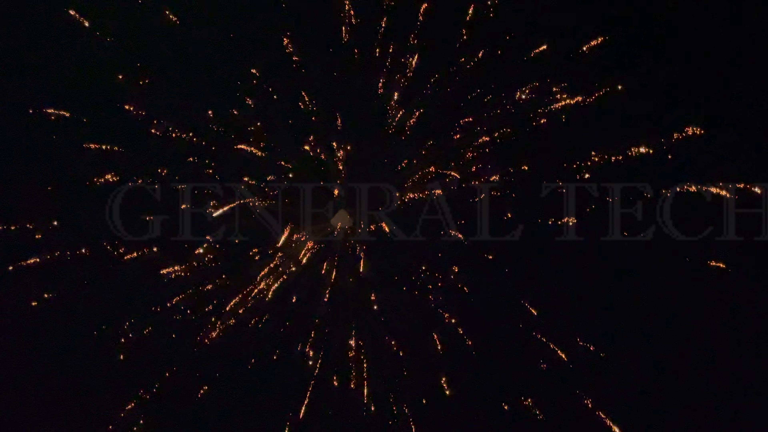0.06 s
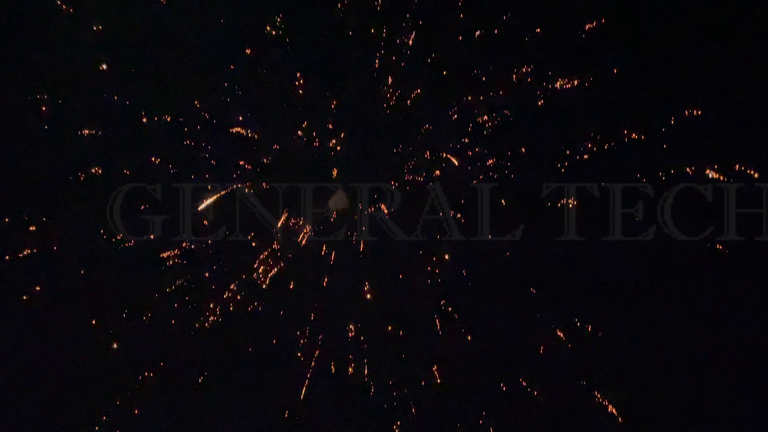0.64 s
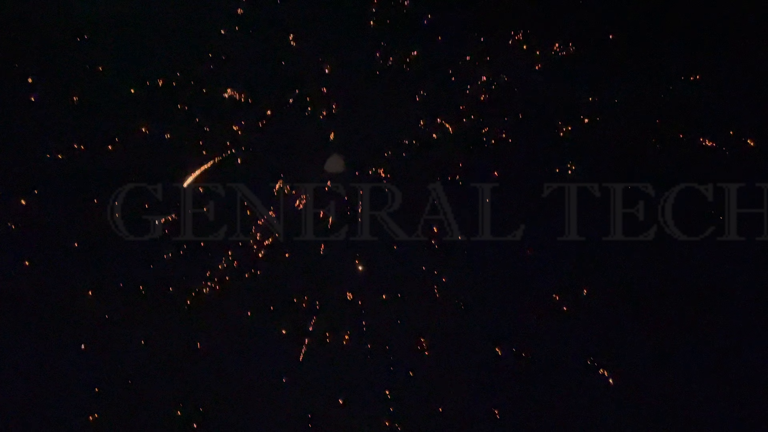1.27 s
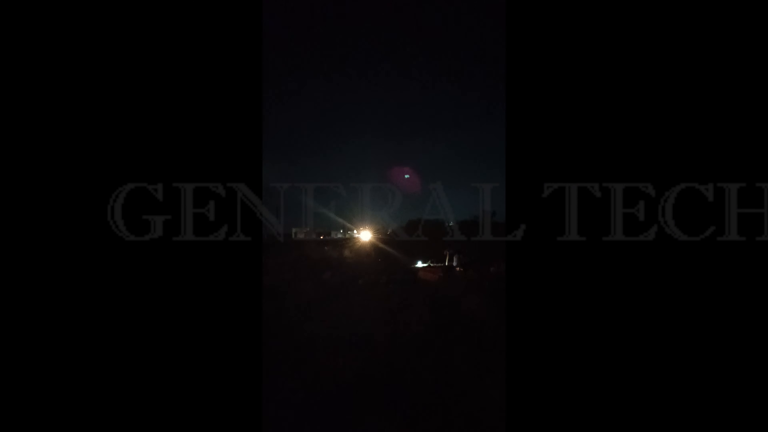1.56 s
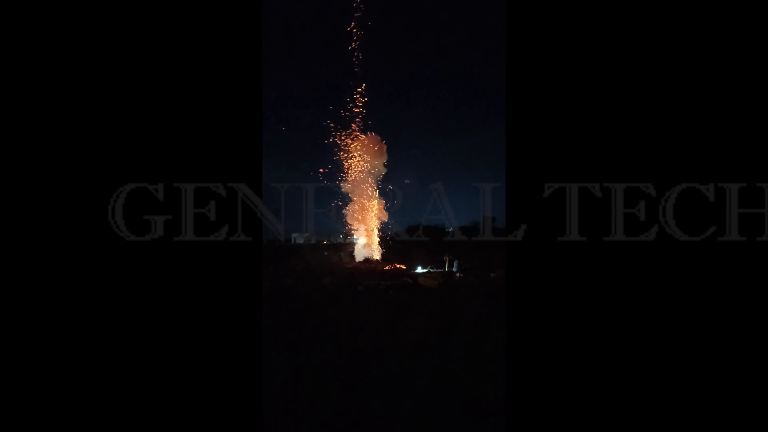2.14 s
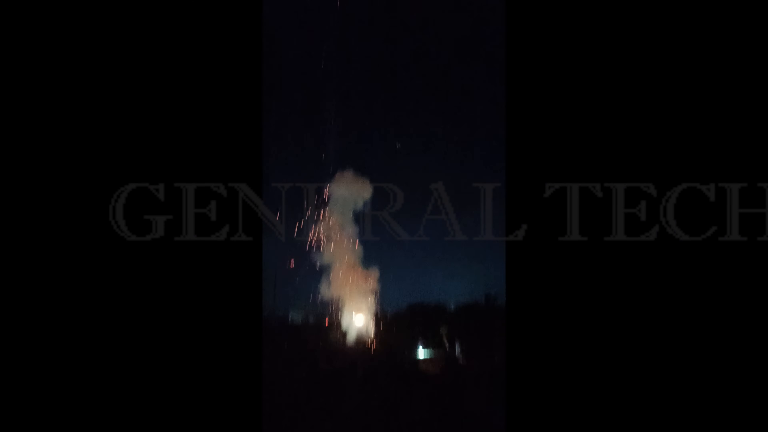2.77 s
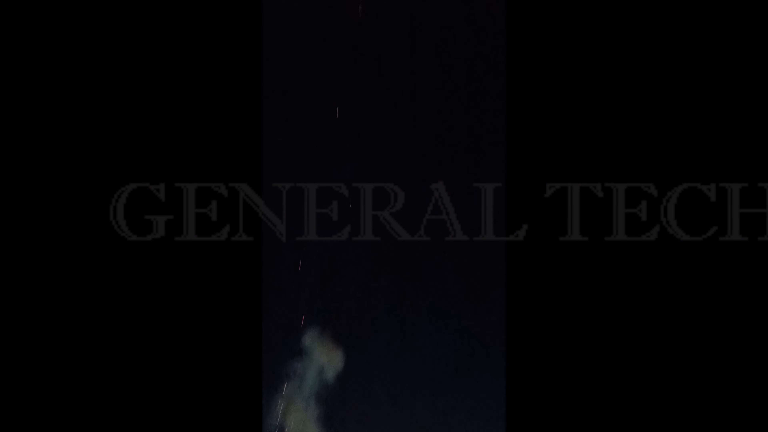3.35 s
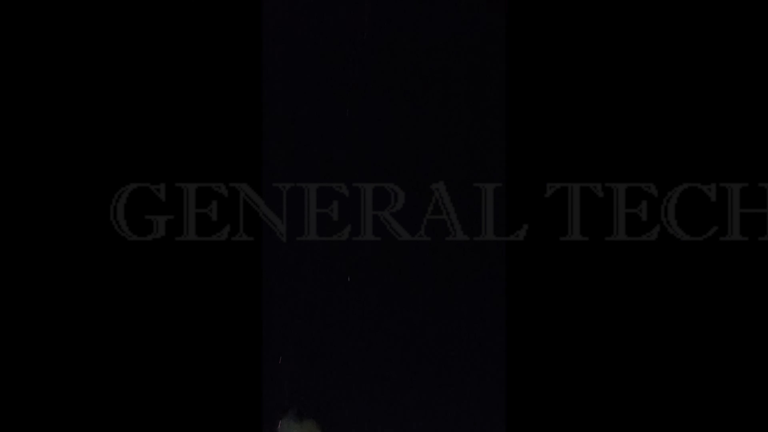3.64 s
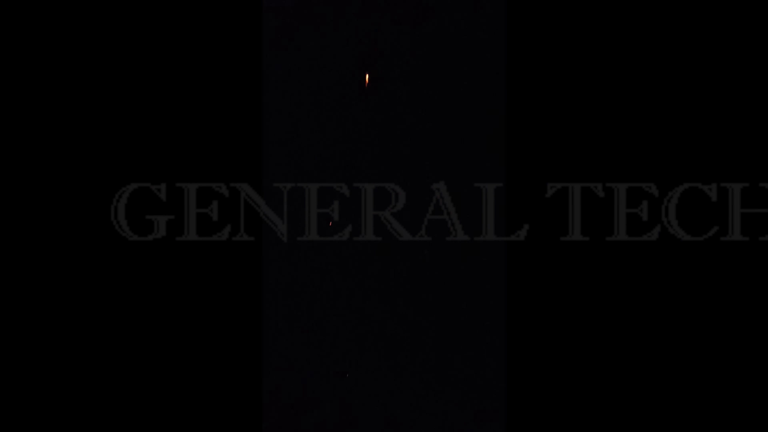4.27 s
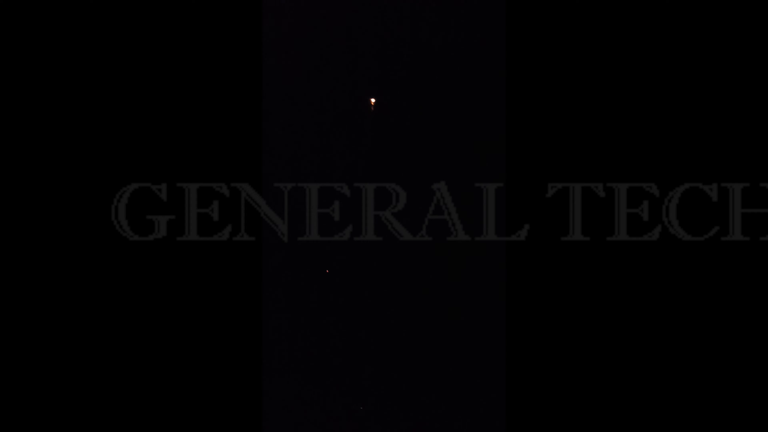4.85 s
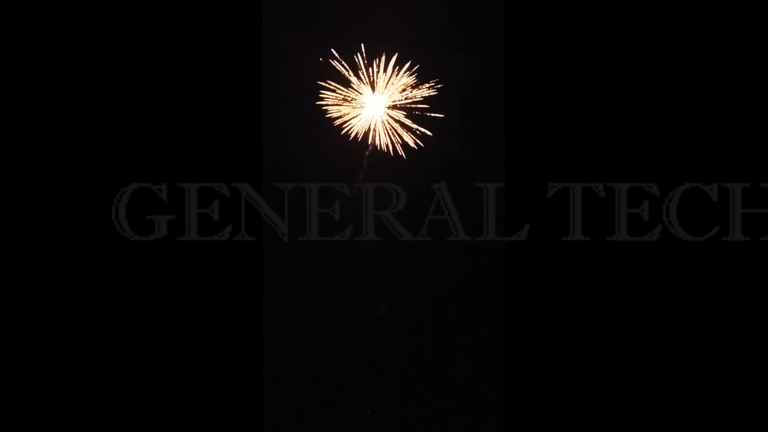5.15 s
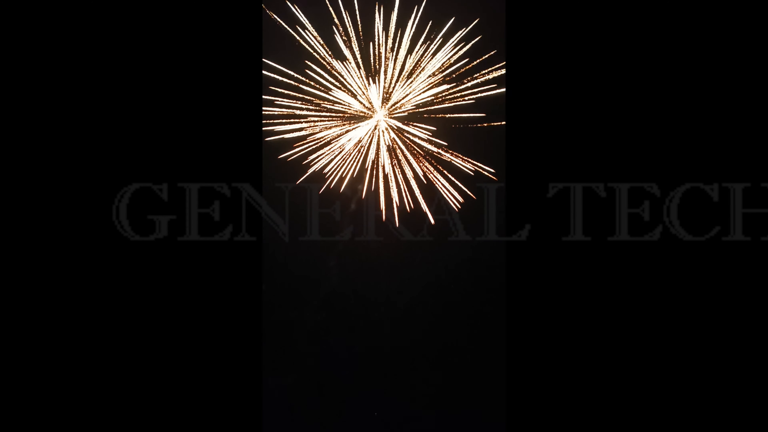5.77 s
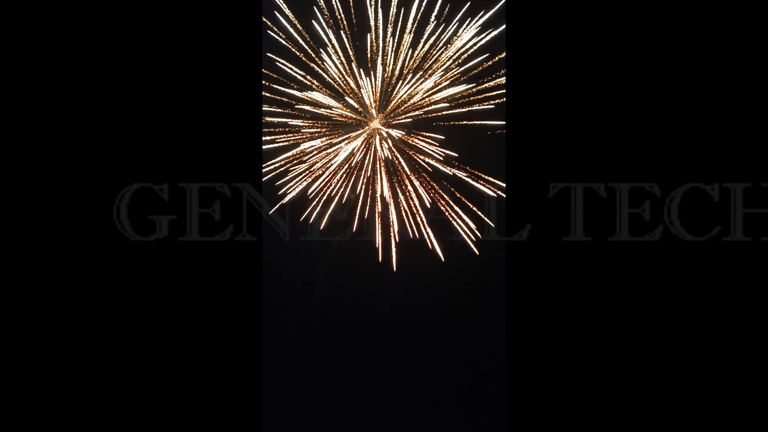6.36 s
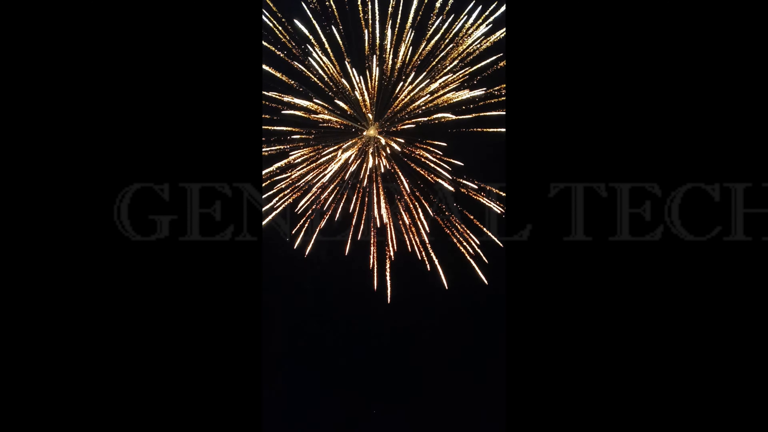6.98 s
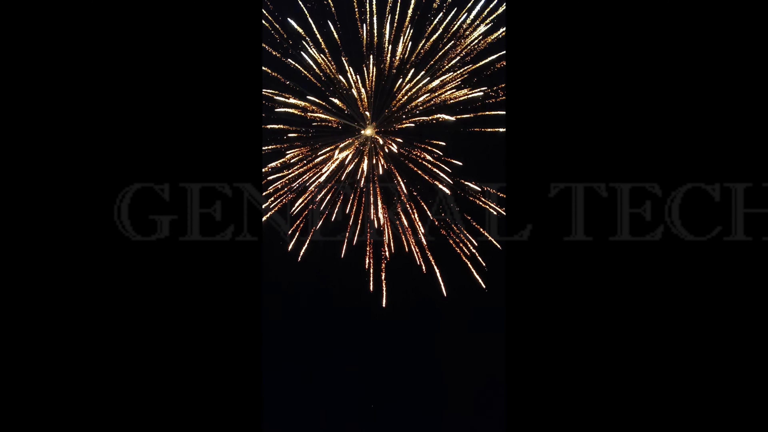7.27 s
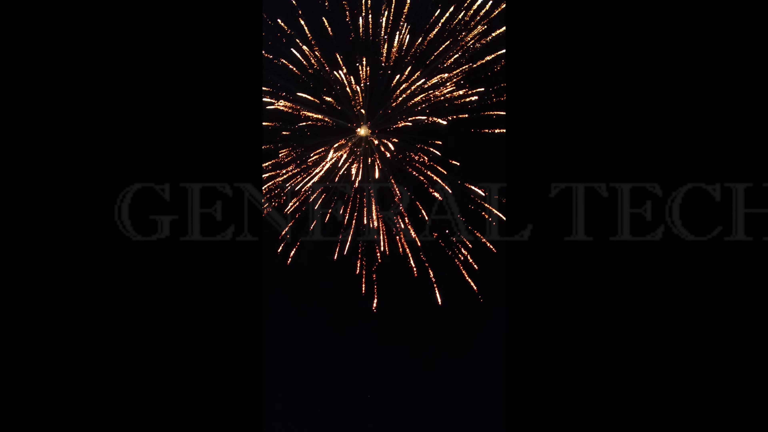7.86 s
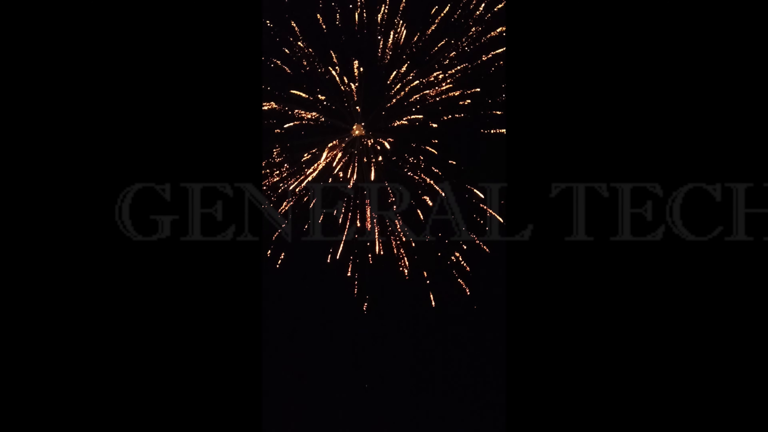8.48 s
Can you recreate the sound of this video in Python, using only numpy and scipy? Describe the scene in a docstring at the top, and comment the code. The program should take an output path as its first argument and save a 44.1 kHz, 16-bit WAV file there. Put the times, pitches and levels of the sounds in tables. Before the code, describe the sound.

Dull distant fireworks, then a punchy launch bang, sputtering sparks and a sharp overhead burst, with wind buffeting the microphone.

```python
"""Faint chirps, thin whirs and dull, far-off fireworks in a night breeze, heard by a hand-held phone.
The scene cuts to a mortar: the fuse hisses, the lift charge bangs, the tube rings and sparks sputter.
The shell climbs hissing and bursts with a sharp crack; echoes follow, the stars roar and sizzle.
Each bang is a cluster of pressure fronts, burning powder is grainy noise, and wind buffets the mic ports."""
import sys
import numpy as np
from scipy import signal
from scipy.fft import rfft, irfft, next_fast_len
from scipy.io import wavfile
from scipy.ndimage import uniform_filter1d, map_coordinates

SR = 44100
rng = np.random.default_rng(int(sys.argv[2]) if len(sys.argv) > 2 else 0)


def generate_wav(signal):
    """Clip the signal to [-1, 1] and save it as 16-bit WAV at the path in sys.argv[1]."""
    frames = np.transpose(np.atleast_2d(signal))
    scaled = np.clip(frames, -1, 1) * 32767
    pcm = np.round(scaled).astype(np.int16)
    wavfile.write(sys.argv[1], SR, pcm)


N = 380362
T = np.arange(N) / SR
CUT_S, TOP_HZ = 1.508, 15900


# the burst and its first reflections:
# (time [s], thump [dB], push [ms], rise [ms], crack [dB], crack decay [ms])
BURST_FRONTS = [(5.4404, -2, 1.17, 0.056, -3.5, 1.45), (5.444, -10.5, 1.6, 0.02, -26, 3.8),
                (5.446, -5, 2.6, 0.3, -24, 5.3), (5.451, 1.5, 1.18, 0.22, -15, 1.8),
                (5.4796, -42, .5, .2, -15, 0.54)]
# tone of its crack: (frequency [Hz], level [dB])
BURST_COLOUR = [(150, -5), (330, 2), (800, -4), (1400, 2), (2100, 7), (3000, -6.5), (6000, -15.5),
                (8700, -6.5), (11000, -16), (16000, -20)]
BURST_S = BURST_FRONTS[0][0]
def burst():
    """The shell bursts overhead, a little to the left: a sharp crack on a deep thump."""
    bang = blast(BURST_FRONTS, BURST_COLOUR, ring_hz=114, damping=0.44, apart_hz=3000)
    return arrive(bang, lead_ms=0.11) * ports(2.4)


# pressure fronts from the mortar:
# (time [s], thump [dB], push [ms], rise [ms], crack [dB], crack decay [ms])
LIFT_FRONTS = [(1.856, -9, 2.1, 0.15, -15, 6.8), (1.861, -29, 2.2, 0.34, -9, 5.6),
               (1.865, -25, 1, 0.35, -5, 4.1), (1.871, -11, 1.7, 0.45, -6, 4.3),
               (1.8766, -11, 1.2, 0.38, -39, 4.8), (2.001, -11, 3, 0.5, -17, 3.5),
               (2.4407, -16.5, 3.27, 0.71, -21, 2.7)]
# tone of their crack: (frequency [Hz], level [dB])
LIFT_COLOUR = [(150, -12), (300, 0), (400, -29), (540, -4), (700, -6), (1100, -14.5), (1500, -4),
               (1850, -7.5), (2500, 3.5), (3200, -12), (5500, -23), (8500, -19), (11000, -28), (16000, -25)]
LIFT_S = LIFT_FRONTS[0][0]
def lift():
    """The lift charge fires the shell with a ragged, punchy bang."""
    return blast(LIFT_FRONTS, LIFT_COLOUR, ring_hz=188, damping=0.31, apart_hz=4870)


# resonances of the tube: (frequency [Hz], level [dB], decay [ms])
TUBE_MODES = [(535, -27.5, 22), (654, -21.5, 9.2), (990, -47, 22)]
# tone of the boom: (frequency [Hz], level [dB])
BOOM_COLOUR = [(200, -16), (350, 8), (440, -2.5), (620, -7), (750, -9), (860, -14), (985, -11), (1150, -26),
               (2000, -45)]
def tube(start_s=1.885, rise_ms=4, boom_db=-34, boom_db_per_s=-12):
    """The emptied mortar tube rings briefly, and a hollow boom rolls on behind the lift."""
    age = T - start_s
    ring = sum(undb(db) * swell(start_s, rise_ms, decay_ms) * np.sin(2 * np.pi * hz * age)
               for hz, db, decay_ms in TUBE_MODES)
    roll = held(start_s, length_s=0.22, attack_s=0.01, release_s=0.0054)
    return ring + roll * undb(boom_db + boom_db_per_s * age) * noise(BOOM_COLOUR, alike=1)


# echoes of the bangs, the second bang's body (2.003 s), a surge as the stars' roar sets in (6.184 s) and a
# star's pop (6.514 s): # (time [s], rumble [dB], hiss [dB], rise [ms], decay [ms])
AFTER_SWELLS = [(1.882, -18, -27, 3.3, 10), (1.935, -36, -30, 15, 19), (1.975, -37, -33, 11, 26),
                (2.003, -19, -11, 4.5, 2.6), (2.04, -37, -33.5, 19, 41), (2.064, -34, -39, 2.5, 8.2),
                (2.092, -30, -29.5, 2.8, 6.6), (2.45, -35.5, -48.5, 40, 33), (5.457, -37, -28.5, 3.1, 22),
                (5.495, -27.5, -33, 0.7, 86), (5.511, -21, -37.5, 16, 16), (5.87, -30.5, -43, 29, 24),
                (6.184, -30.5, -36.5, 20, 43), (6.514, -23, -24, 0.52, 3.4), (6.655, -23, -36, 30, 30),
                (6.77, -29, -56, 2, 31)]
# tones of their hiss and their rumble: (frequency [Hz], level [dB])
SWELL_HISS_COLOUR = [(150, -32), (350, 5), (600, 0), (1100, -3), (1500, 2), (2300, 3.5), (3200, -4),
                     (6500, -10.5), (8700, -8.5), (11000, -18.5), (16000, -24)]
SWELL_RUMBLE_COLOUR = [(40, -20), (90, 3.5), (170, 11.5), (320, -1.5), (600, -10.5), (1200, -23)]
def after_swells(dulling_s=0.22, dull_hz=3800):
    """Swells of rumble and hiss follow the lift and the burst; the later they come, the duller."""
    rumble = sum(undb(db) * swell(s, rise, decay) for s, db, _, rise, decay in AFTER_SWELLS)
    hiss = sum(undb(db) * swell(s, rise, decay) for s, _, db, rise, decay in AFTER_SWELLS)
    bright = noise(SWELL_HISS_COLOUR, alike=0.66, apart_hz=1610, grain_db=3.5)
    dull = soften(bright, dull_hz)
    age = T - np.where(T < BURST_S, LIFT_S, BURST_S)
    early = 1 / (1 + (age / dulling_s) ** 4)
    return rumble * noise(SWELL_RUMBLE_COLOUR, alike=0.98) + hiss * (dull + early * (bright - dull))


# tones of the tail's rush and its sizzle: (frequency [Hz], level [dB])
RUSH_COLOUR = [(100, 12), (300, -11), (700, 1.5), (1000, 0), (1300, 1.5), (1650, 2.5), (2250, -0.5),
               (2750, -4), (3350, -4), (3750, -18.5), (4200, -26), (5300, -20), (7000, -20.5),
               (10000, -26.5), (16000, -33)]
TAIL_SIZZLE_COLOUR = [(2500, 3), (4500, 13.5), (6000, 9), (8000, 3.5), (9500, 3.5), (11000, -3.5),
                      (12300, -21), (14500, -9), (16000, -21)]
def shell_tail(start_s=2.825, rush_db_per_s=3.5, sizzle_db_per_s=2, flutter_db=1.5):
    """The climbing shell hisses from one point, ever louder; its sizzle flares before the burst."""
    age = np.clip(T, start_s, BURST_S) - start_s
    rush = noise(RUSH_COLOUR, alike=0.975, apart_hz=40000, grain_db=2.5)
    rush *= undb(-48 + rush_db_per_s * age) * ports(-0.64)
    flare = undb(-50.5) * swell(5.05, rise_ms=360, decay_ms=62)
    sizzle = noise(TAIL_SIZZLE_COLOUR, alike=0.975, apart_hz=23500, grain_db=2)
    sizzle *= (undb(-59 + sizzle_db_per_s * age) + flare) * undb(flutter_db * walk(35))
    direct = (rush + sizzle) * held(start_s, BURST_S - start_s, attack_s=0.39, release_s=0.026)
    return direct + bounces(direct, age)


# reflections close to the phone: (delay [ms], drift [ms/s], left level [dB], right level [dB])
BOUNCES = [(0.89, 0.026, -17, -11.5), (0.085, 0.0088, -28, -12)]
def bounces(direct, age, tremor_ms=0.004):
    """Dull reflections hollow the hiss; their delays drift with the tilt and shake with the hand."""
    dull = soften(direct, hz=6500)
    out = 0
    for delay_ms, drift_ms_per_s, left_db, right_db in BOUNCES:
        lag_ms = delay_ms + drift_ms_per_s * age + tremor_ms * walk(7)
        delayed = np.array([np.interp(T - lag_ms / 1000, T, side) for side in dull])
        out = out + undb([[left_db], [right_db]]) * delayed
    return out


# the stars flare up and burn down: (time [s], relative roar [dB], relative sizzle [dB])
STAR_LEVELS = [(5.64, -51.5, -57), (5.92, -48.5, -56.5), (6.69, -36.5, -54.5), (7.03, -42.5, -54.5),
               (7.21, -41.5, -49), (7.38, -42, -52), (7.71, -43, -64), (7.91, -49.5, -57.5),
               (8.22, -47, -77), (8.35, -51, -62.5), (8.6, -46.5, -64), (8.62, -56, -59)]
# tone of their roar: (frequency [Hz], level [dB])
STAR_COLOUR = [(100, 9), (300, 1.5), (700, 1), (1200, -5), (1900, -1.5), (3000, -7), (4200, -14),
               (5600, -18.5), (7500, -32), (12000, -49), (16000, -60)]
def stars(roar_db=5.5, sizzle_db=1.5, attack_s=0.037, focus_per_s=0.23, flutter_db=1.04):
    """Stars roar all over the sky, narrowing to a hiss; returns their rush and sizzle envelope."""
    roar_curve_db, sizzle_curve_db = curves(STAR_LEVELS)
    lit = np.clip((T - BURST_S) / attack_s, 0, 1)
    focus = np.clip(focus_per_s * (T - BURST_S), 0, 1)
    roar = noise(STAR_COLOUR, alike=1, apart_hz=686, grain_db=3) * ports(0.3)
    hiss = noise(RUSH_COLOUR, alike=1, grain_db=3) * ports(-2.3)
    rush = np.sqrt(1 - focus) * roar + np.sqrt(focus) * hiss
    rush *= undb(roar_curve_db + roar_db + flutter_db * walk(34))
    return lit * rush, lit * undb(sizzle_curve_db + sizzle_db)


# tone of powder burning at the mortar: (frequency [Hz], level [dB])
MORTAR_COLOUR = [(100, 9), (300, 7.5), (650, 6), (850, 1), (985, 11), (1170, -6), (1350, 9), (1750, 8.5),
                 (2350, 9), (2900, 2.5), (4200, -2.5), (6000, -11), (9000, -17.5), (11500, -49),
                 (16000, -43)]
def mortar(shower_db_per_s=-2.5, sizzle_extra_db_per_s=-14):
    """The fuse hisses, then a spark shower sputters out; returns their rush and sizzle envelope."""
    fuse = held(CUT_S, LIFT_S - CUT_S, attack_s=0.004, release_s=0.088)
    age = np.maximum(T - LIFT_S, 0)
    shower = held(LIFT_S, length_s=1.48, attack_s=0.09, release_s=0.11) * undb(shower_db_per_s * age)
    rush = noise(MORTAR_COLOUR, alike=1, apart_hz=2690)
    sputter = crackle(per_s=480, decay_ms=3.2, spread_db=1.7)
    sizzle = undb(-60.5) * fuse + undb(-53.5 + sizzle_extra_db_per_s * age) * shower
    return rush * (undb(-49) * fuse + undb(-44) * shower * sputter), sizzle


# sparks, singly or in clumps: (time [s], relative level [dB], rise [ms], decay [ms])
SPARK_POPS = [(2.125, -29.5, 1.2, 4.8), (2.222, -33, 3, 26), (2.272, -37, .8, 4), (2.313, -42, .8, 6.4),
              (2.366, -33.5, 1.5, 8), (2.388, -34, 6, 7), (2.42, -35, 14, 92), (2.567, -47, .6, 2.2),
              (2.617, -34, 0.34, 4), (2.699, -35, 1, 4.9), (2.718, -36.5, 5.1, 7.3), (2.753, -34.5, 1, 4),
              (2.769, -40, 3.6, 11), (2.832, -32.5, .8, 4), (2.848, -35, .8, 20), (2.876, -34, 1.5, 69),
              (2.921, -34.5, .6, 2), (2.99, -36, .8, 5.2), (3.007, -30, 0.5, 7.7), (3.06, -42, .8, 4),
              (3.161, -30.5, 1.1, 4.1), (3.236, -31.5, 2.3, 14), (3.315, -33.5, 1, 5.8),
              (3.336, -38, 1.5, 13), (3.387, -30.5, 14, 8.9), (3.452, -32.5, 0.94, 4.3),
              (5.749, -31.5, .5, 2.5), (6.514, -22, 0.43, 2)]
def sparks(gain_db=-6.5):
    """Sparks pop as small, short cracks."""
    pops = sum(undb(db + gain_db) * swell(s, rise, decay) for s, db, rise, decay in SPARK_POPS)
    return pops * noise(MORTAR_COLOUR, alike=0.82, apart_hz=2940, grain_db=-2) * ports(1)


# spurts of sizzle: (time [s], level [dB], rise [ms], decay [ms])
SPURTS = [(2.24, -47.5, 9.2, 6.2), (2.445, -67, 5.2, 5.7), (2.71, -56, 15, 14), (2.885, -56, 18, 29),
          (3.37, -59, 70, 54), (6.18, -64, 22, 130), (6.64, -65, 30, 40), (6.9, -53, 37, 20),
          (7.05, -53, 25, 56), (7.22, -53, 90, 100), (7.37, -57, 15, 18), (7.62, -44.5, 56, 68),
          (7.73, -52, 25, 65), (7.88, -52.5, 33, 28), (8.12, -53.5, 53, 50), (8.47, -52.5, 88, 35)]
# tone of the sizzle of fuse, sparks and stars: (frequency [Hz], level [dB])
SIZZLE_TONE = [(2500, 4.5), (4500, 1.5), (5600, 3.5), (7500, 2.5), (9400, 2.5), (11000, -7), (13000, -12),
               (16000, -23)]
# where that sizzle sits: (time [s], left minus right [dB])
SIZZLE_PAN = [(1.5, 6), (2.2, 4), (3.2, 31), (5.4, 5), (6.1, 6), (6.7, -1), (7.25, -8), (7.8, -3),
              (8.6, -1)]
# the phone turns: (time [s], lead of the left port [ms])
PHONE_TURN = [(1.5, .1), (2.8, .1), (3.2, .235), (3.4, .278), (3.8, .305), (4.1, .308), (4.7, .285),
              (5.2, .235), (5.45, .205), (6.2, .02), (6.6, -.079), (7.0, -.172), (7.6, -.287), (8.6, -.4)]
def powder(flutter_db=1.5, surge_db=0.8):
    """Mortar, tail and stars burn and sizzle; the gap between the ports moves as the phone turns."""
    (lead_ms,), (pan_db,) = curves(PHONE_TURN), curves(SIZZLE_PAN)
    mortar_rush, mortar_sizzle = mortar()
    star_rush, star_sizzle = stars()
    spurt_power = sum((undb(db) * swell(s, rise, decay)) ** 2 for s, db, rise, decay in SPURTS)
    envelope = np.sqrt(mortar_sizzle ** 2 + star_sizzle ** 2 + spurt_power)
    envelope *= undb(flutter_db * walk(60) + surge_db * walk(26))
    sizzle = noise(SIZZLE_TONE, alike=0.63, apart_hz=30000, grain_db=1.5) * envelope * ports(pan_db)
    return arrive(mortar_rush + shell_tail() + star_rush + sizzle, lead_ms)


# the wind bed after the cut: (time [s], relative left level [dB], relative right level [dB])
WIND_BED = [(1.5, -52, -46.5), (1.8, -42.5, -37), (2.25, -48.5, -44.5), (2.6, -48.5, -41.5),
            (2.75, -46.5, -31), (3.15, -38.5, -28.5), (3.7, -43, -40.5), (3.8, -41, -40),
            (4.05, -36.5, -37), (4.4, -36, -38.5), (4.65, -40, -27), (5.35, -42, -28), (5.65, -39.5, -44),
            (6.05, -40, -40), (6.55, -32, -33.5), (7.1, -35, -33.5), (7.95, -33, -27.5), (8.1, -45, -24),
            (8.6, -43, -20.5)]
# gusts on top: (time [s], length [s], relative level [dB], left minus right [dB])
GUSTS = [(0.246, 0.084, -51, 0), (0.616, 0.16, -50, 0), (1.293, 0.21, -45, 1), (1.55, 0.18, -42, -12),
         (3.403, 0.33, -29.5, -12), (3.575, 0.048, -35, 18), (3.836, 0.11, -28.5, 9),
         (3.967, 0.025, -20, -26), (4.47, 0.12, -25.5, -17), (4.711, 0.18, -27.5, -31),
         (5.125, 0.32, -29.5, -21), (6.806, 0.091, -29.5, -22), (7.209, 0.14, -26, -20),
         (7.513, 0.13, -32, -9), (8.13, 0.3, -29, -18), (8.435, 0.2, -26, -18)]
# tones of the wind, its eddies and the opening breeze: (frequency [Hz], level [dB])
WIND_COLOUR = [(22, -34), (40, -62), (60, -22.5), (90, -1.5), (160, 2.5), (240, -3.5), (330, -11),
               (480, -28), (800, -38.5), (2000, -82)]
EDDY_COLOUR = [(100, -44), (280, 10.5), (450, 2.5), (800, -15.5), (1600, -38), (4000, -47), (12000, -69)]
BREEZE_COLOUR = [(22, -55), (45, 14), (80, 9), (140, 7), (220, -1), (400, -20.5), (700, -17), (2000, -50)]
def wind(gain_db=1.5, flurry_db=3, eddy_db=-17, eddy_flurry_db=5):
    """Turbulence rumbles at each port, brighter in flurries; before the cut both share one breeze."""
    breeze_db = np.interp(T, [0.85, 0.97], [-50, -56])  # drops to a lull
    steady = undb(np.where(T < CUT_S, breeze_db, curves(WIND_BED)))
    gust_power = sum((undb(db) * ports(pan) * held(s, length, attack_s=0.026, release_s=0.014)) ** 2
                     for s, length, db, pan in GUSTS)
    flurry = np.array([walk(78), walk(55.4)])
    eddies = undb(eddy_db + eddy_flurry_db * flurry) * noise(EDDY_COLOUR)
    turbulence = undb(gain_db) * (undb(flurry_db * flurry) * noise(WIND_COLOUR) + eddies)
    breeze = (noise(BREEZE_COLOUR) + eddies)[0]
    return np.where(T < CUT_S, breeze, turbulence) * np.sqrt(steady ** 2 + gust_power)


# eddies striking a port: (time [s], relative level [dB], left minus right [dB])
BUFFETS = [(2.699, -24.5, -17), (2.758, -26, -12), (2.829, -32, -10), (2.995, -21.5, -24), (3.233, -27, -8),
           (3.87, -15.5, 25), (3.984, -18, -27), (4.414, -24.5, -2), (4.531, -21, -23), (5.239, -19.5, -27),
           (7.207, -14.5, -17), (7.578, -14, -17), (8.275, -16, -21), (8.446, -12.5, -33)]
def buffets(gain_db=-6, edge_db=-2, peak_lag_s=0.00755):
    """Single eddies thud on a port, with a brighter, shorter edge."""
    thud = edge = 0
    for s, db, pan in BUFFETS:
        force = undb(db + gain_db) * ports(pan)
        thud += force * swell(s + peak_lag_s, rise_ms=2.4, decay_ms=11)
        edge += force * undb(edge_db) * swell(s + peak_lag_s, rise_ms=0.7, decay_ms=5.5)
    return thud * noise(WIND_COLOUR, alike=0.93) + edge * noise(EDDY_COLOUR, alike=0.55)


# a distant front: (time [s], thump [dB], push [ms], rise [ms], crack [dB], crack decay [ms])
FAR_FRONT = [(.9402, -20.5, 1.25, 1, -72, 3.4)]
def far_bang(cutoff_hz=700):
    """A low bang from far away; distance takes its edge off."""
    bang = blast(FAR_FRONT, MORTAR_COLOUR, ring_hz=77, damping=0.12, apart_hz=2000)
    return signal.sosfilt(signal.butter(4, cutoff_hz, fs=SR, output="sos"), bang)


# distant pops before the cut: (time [s], level [dB])
FAR_POPS = [(.221, -49), (0.267, -40.5), (.283, -53), (.39, -48), (0.403, -47), (.451, -51), (1.299, -44),
            (1.344, -40), (1.371, -39), (1.421, -41), (1.447, -40)]
# their muffled tone: (frequency [Hz], level [dB])
FAR_POP_COLOUR = [(120, 1), (300, 8), (600, -2.5), (900, -13.5), (1500, -36), (3000, -58)]
def far_pops():
    """Distant fireworks pop softly, their treble lost on the way."""
    pops = sum(undb(db) * swell(s, rise_ms=1, decay_ms=9) for s, db in FAR_POPS)
    return pops * noise(FAR_POP_COLOUR, alike=0.98)


# tone of the night ambience: (frequency [Hz], level [dB])
FIELD_COLOUR = [(30, 0), (100, -39), (350, -1), (700, 5.5), (1100, 9), (1800, 5), (2500, 1), (3200, -10.5),
                (4200, -24.5), (7000, -16.5), (10000, -44), (16000, -58)]
def field(before_db=-64, after_db=-58, rise_db=4, rise_s=0.26, wander_db=0.5):
    """A dull, distant hiss over the field; it swells at first and is louder after the cut."""
    opening_db = before_db - rise_db * np.clip(1 - T / rise_s, 0, 1)
    level_db = np.where(T < CUT_S, opening_db, after_db)
    return noise(FIELD_COLOUR, alike=0.27) * ports(-2.5) * undb(level_db + wander_db * walk(36))


# distant whirs: (centre time [s], half length [s], pitch [Hz], bandwidth [Hz], level [dB])
WHIRS = [(0.62, 0.3, 2410, 240, -66.5), (0.66, 0.26, 4800, 1100, -88), (0.42, 0.24, 7000, 600, -83),
         (1.16, 0.09, 3300, 290, -75), (1.36, 0.079, 3060, 240, -69)]
def whirs(flutter=0.23):
    """Thin bands of noise swell, flutter and fade on the right."""
    out = np.zeros(N)
    for s, half_s, hz, width_hz, db in WHIRS:
        bandpass = signal.butter(2, [hz - width_hz / 2, hz + width_hz / 2], "band", fs=SR, output="sos")
        band = signal.sosfilt(bandpass, rng.standard_normal(N))
        out += undb(db) * band / band.std() * np.exp(-np.square((T - s) / half_s) ** 2)
    return out * (1 + flutter * walk(60)) * ports(-14)


# runs of animal calls: (time [s], length [s], level [dB], pitch [Hz], call spacing [s])
CHIRP_RUNS = [(0.072, .09, -79.5, 6700, 0.034), (.253, .09, -83, 6740, 0.031),
              (0.44, .09, -81, 6700, 0.032), (0.747, .135, -79, 6600, 0.029), (0.97, .09, -82, 6570, 0.032),
              (1.154, .12, -78, 6700, 0.029), (1.36, .135, -76, 6600, 0.033),
              (1.508, .38, -58.5, 8230, 0.17), (3.192, .03, -65, 8970, .13), (3.374, .3, -64, 8640, 0.055),
              (3.841, .65, -61.5, 8700, 0.14)]
def chirps(call_s=0.0245, fall=0.12, detune=0.009, rough=0.82, rasp=0.059, scatter_db=3):
    """Night animals call in runs of faint, raspy chirps, each sliding down in pitch."""
    out = np.zeros(N)
    progress = np.linspace(0, 1, int(call_s * SR))
    for start, run_s, db, hz, spacing_s in CHIRP_RUNS:
        s, call_db, step_s = start, db + 1.5, spacing_s * 0.79  # the first call is louder and hurried
        while s < start + run_s:
            pitch = hz * (1 + detune * rng.standard_normal() + fall * (0.5 - progress))
            pitch *= 1 + rasp * rng.standard_normal(len(progress))
            call = np.sin(np.pi * progress) * np.sin(2 * np.pi * np.cumsum(pitch) / SR)
            at = int(s * SR)
            out[at:at + len(call)] += undb(call_db + scatter_db * rng.standard_normal()) * call
            s, call_db, step_s = s + step_s, db, spacing_s
    return out * (1 + rough * walk(500))


def blast(fronts, crack_colour, ring_hz, damping, apart_hz, bright_hz=27000):
    """Each front is an N-wave, push then suction, that tears into a crack; the low end rings briefly."""
    thumps, cracks = np.zeros(N), np.zeros((2, N))
    tear = noise(crack_colour, alike=0.7, apart_hz=apart_hz)
    size = SR // 10
    ms = np.arange(size) * 1000 / SR
    for s, thump_db, push_ms, rise_ms, crack_db, decay_ms in fronts:
        at = int(s * SR)
        n_wave = (1 - ms / push_ms) * np.exp(-(ms / (2 * push_ms)) ** 8)
        thumps[at:at + size] += undb(thump_db) * (1 - np.exp(-ms / rise_ms)) * n_wave
        # weaker fronts are less steep, so their crack is duller
        cutoff_hz = min(bright_hz * undb(crack_db / 2), TOP_HZ)
        crack = undb(crack_db) * np.exp(-ms / decay_ms) * tear[:, at:at + size]
        cracks[:, at:at + size] += signal.lfilter(*signal.butter(2, cutoff_hz, fs=SR), crack)
    w = 2 * np.pi * ring_hz / SR
    ringing_highpass = signal.bilinear([1, 0, 0], [1, damping * w, w * w])
    return signal.lfilter(*ringing_highpass, thumps) + cracks


def noise(colour, alike=0, apart_hz=20000, grain_db=0):
    """Coloured stereo noise of rms 1; the ports share the part `alike` of it below apart_hz."""
    size = next_fast_len(N)
    white = rng.standard_normal((3, N))
    if grain_db:  # uneven sample levels give it grain
        white *= undb(grain_db * np.minimum(rng.exponential(size=N), 7))
    spectra = rfft(white, size)
    f = np.maximum(np.fft.rfftfreq(size, 1 / SR), 1)
    hz, db = np.transpose(colour)
    gain = undb(np.interp(np.log(f), np.log(hz), db))
    gain *= np.minimum(f / hz[0], 1) * np.minimum(hz[-1] / f, 1)  # rolls off past both ends
    shared = alike / (1 + (f / apart_hz) ** 2)
    pair = irfft(gain * (np.sqrt(shared) * spectra[2] + np.sqrt(1 - shared) * spectra[:2]), size)[:, :N]
    return pair / pair.std()


def crackle(per_s, decay_ms, spread_db):
    """The envelope of many tiny pops at random moments, a few of them strong; rms 1."""
    fires = rng.random(N) < per_s / SR
    pops = fires * undb(spread_db * np.minimum(rng.exponential(size=N), 3)) ** 2
    power = signal.lfilter([1], [1, -np.exp(-1000 / (decay_ms * SR))], pops) + 1e-18
    return np.sqrt(power / power.mean())


def walk(per_s):
    """A smooth random wander with a spread of 1."""
    size = max(int(SR / per_s), 2)
    wander = uniform_filter1d(rng.standard_normal(N), size, mode="wrap")
    wander = uniform_filter1d(wander, size, mode="wrap")
    return wander / wander.std()


def swell(s, rise_ms, decay_ms):
    """An exponential rise and fall that peaks at time s."""
    ms = (T - s) * 1000
    return np.exp(-np.minimum(np.maximum(-ms / rise_ms, ms / decay_ms), 20))


def held(s, length_s, attack_s, release_s):
    """An envelope that rises from time s, holds, and dies away once its length is over."""
    return np.clip((T - s) / attack_s, 0, 1) * np.exp(-np.clip((T - s - length_s) / release_s, 0, 20))


def curves(rows):
    """Each column of a table as a line through time."""
    s, *columns = np.transpose(rows)
    return [np.interp(T, s, column) for column in columns]


def undb(db):
    """Decibels to gain."""
    return 10 ** (np.asarray(db) / 20)


def soften(x, hz):
    """A gentle treble roll-off without delay."""
    return signal.sosfiltfilt(signal.butter(1, hz, fs=SR, output="sos"), x)


def ports(pan_db):
    """Left and right gains with a mean power of 1; positive is left."""
    gains = undb(np.vstack([pan_db, -pan_db]) / 2)
    return gains / np.sqrt(np.mean(gains ** 2, axis=0))


def arrive(pair, lead_ms):
    """The sound reaches the left port lead_ms before the right."""
    positions = np.arange(N) + lead_ms * SR / 1000
    return np.array([map_coordinates(pair[0], [positions], order=5, mode="nearest"), pair[1]])


def scene():
    """The bangs and the swells after them, the burning powder and the night around them."""
    bangs = far_bang() + lift() + burst() + far_pops() + tube() + after_swells()
    return bangs + sparks() + powder() + wind() + buffets() + field() + whirs() + chirps()


# cavity resonances, a list for each port, left first: (frequency [Hz], bandwidth [Hz], gain [dB])
PORT_MODES = [
    [(2200, 1200, -4.5), (8200, 370, 7)],
    [(3020, 1150, -9.5), (7550, 2670, -15.5), (9030, 2060, 7)],
]
def cavity(x, modes):
    """A port's small cavity lifts or dips narrow treble bands."""
    for hz, width_hz, db in modes:
        x = x + (undb(db) - 1) * signal.lfilter(*signal.iirpeak(hz, hz / width_hz, fs=SR), x)
    return x


def record(dry, low_cut_hz=46):
    """The ports colour the treble; the phone thins the deep bass, rounds peaks and cuts the top."""
    heard = np.array([cavity(x, modes) for x, modes in zip(dry, PORT_MODES)])
    heard = signal.sosfilt(signal.butter(2, low_cut_hz, "high", fs=SR, output="sos"), heard)
    return signal.sosfilt(signal.ellip(10, 0.2, 80, TOP_HZ, fs=SR, output="sos"), np.tanh(heard))


dry = scene()
out = record(dry)
generate_wav(out)
```